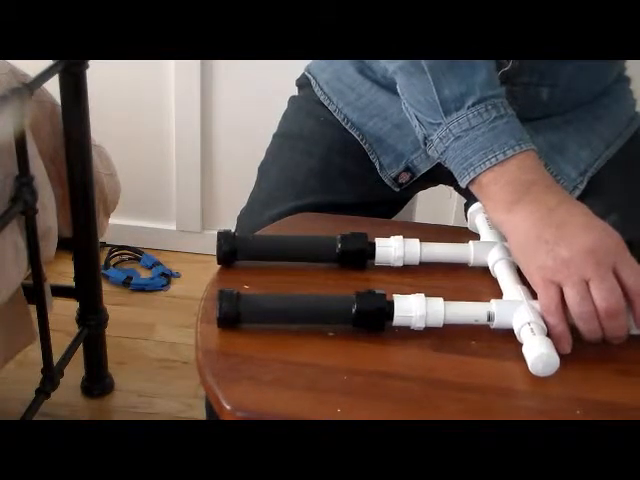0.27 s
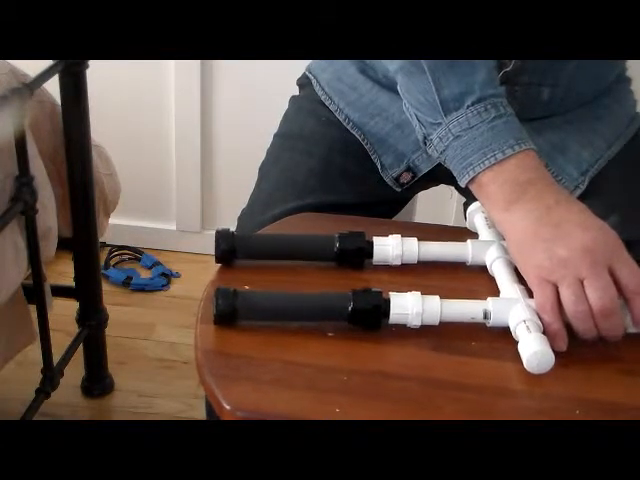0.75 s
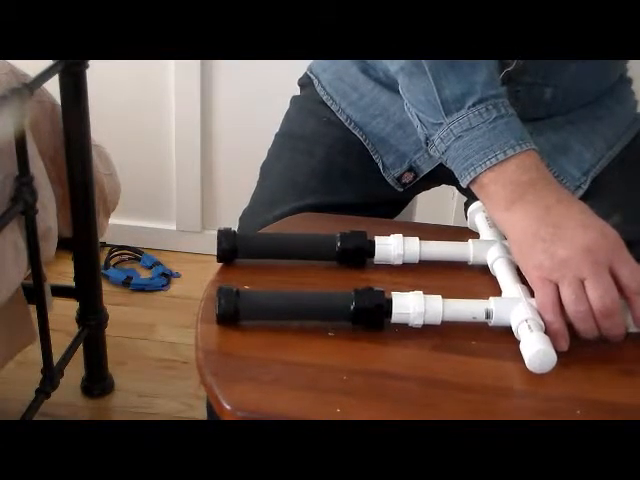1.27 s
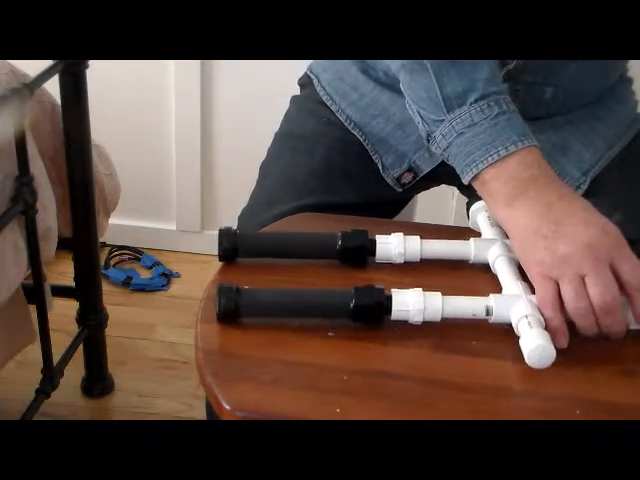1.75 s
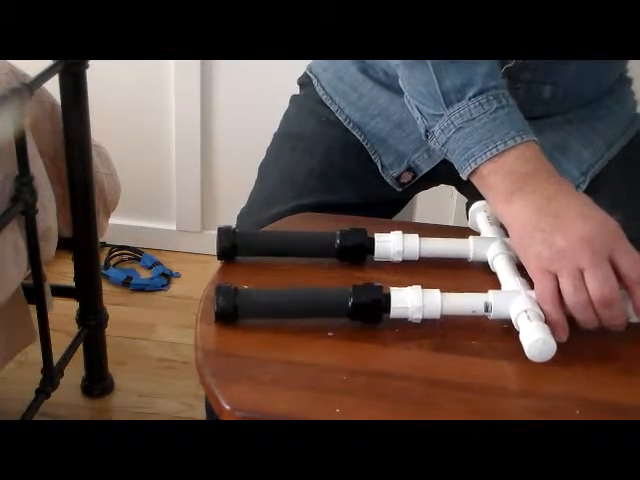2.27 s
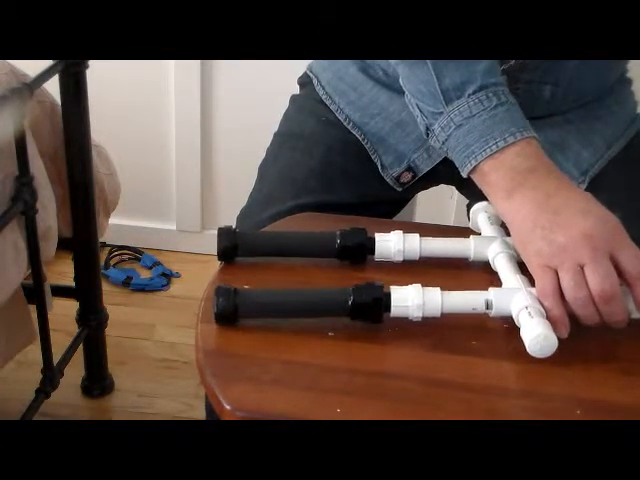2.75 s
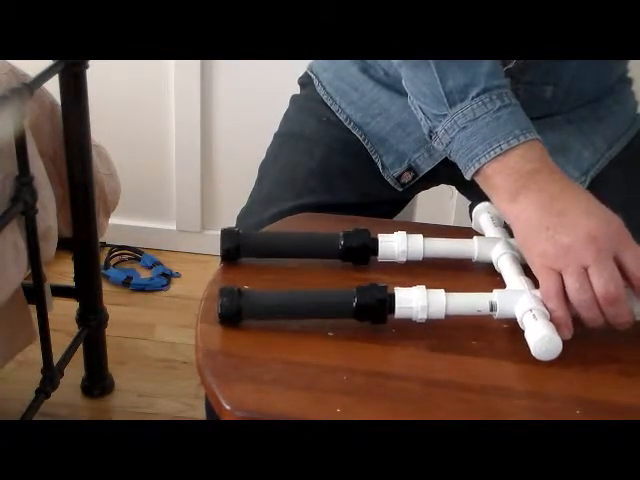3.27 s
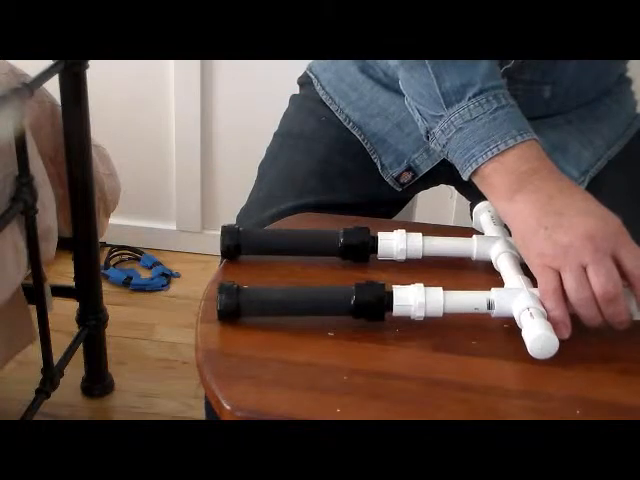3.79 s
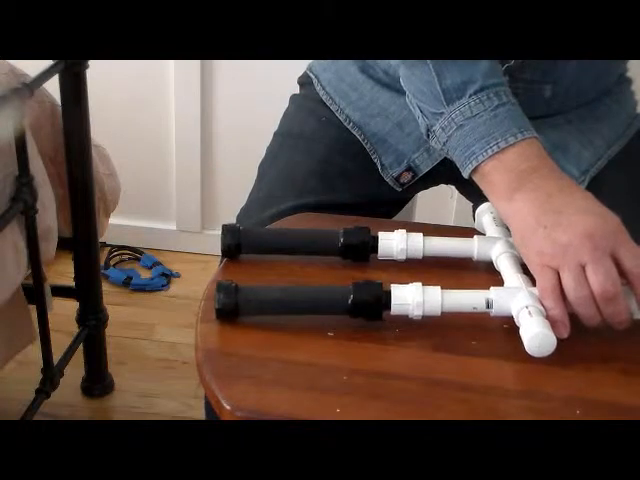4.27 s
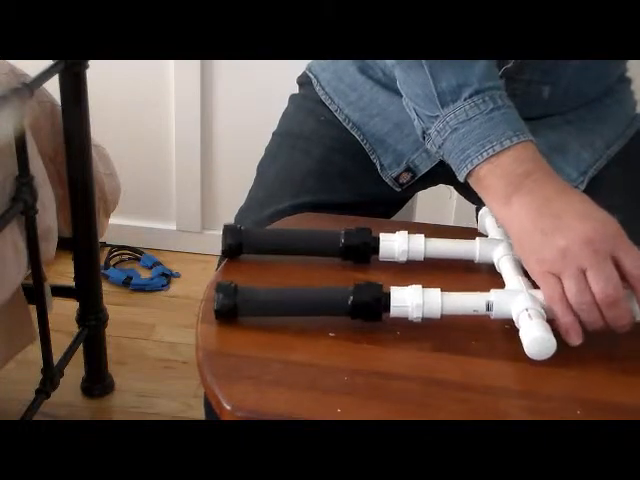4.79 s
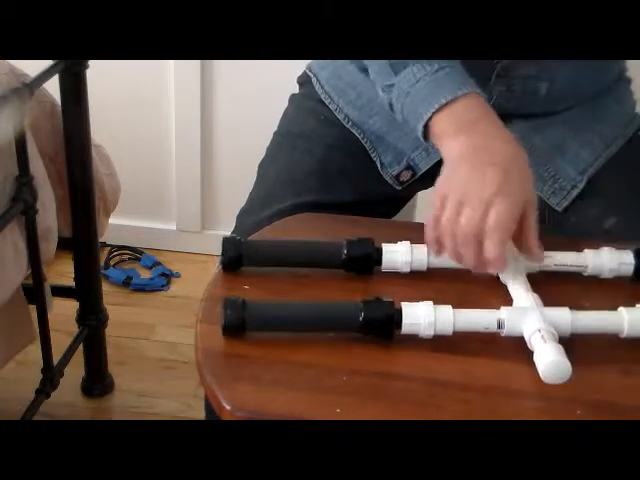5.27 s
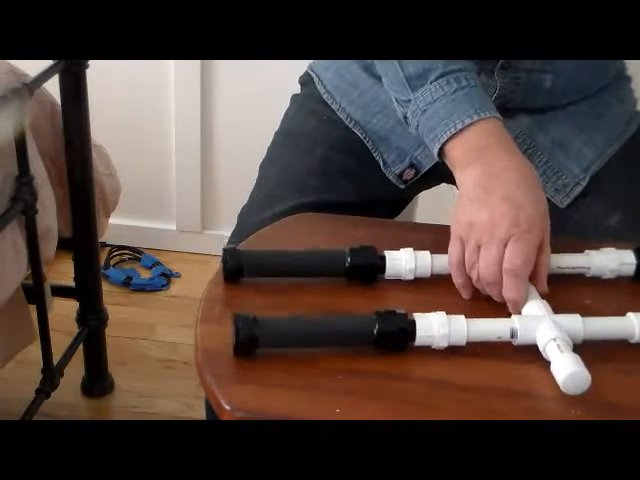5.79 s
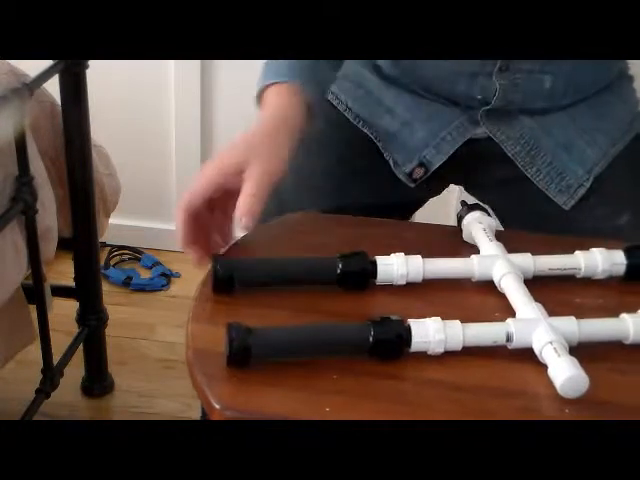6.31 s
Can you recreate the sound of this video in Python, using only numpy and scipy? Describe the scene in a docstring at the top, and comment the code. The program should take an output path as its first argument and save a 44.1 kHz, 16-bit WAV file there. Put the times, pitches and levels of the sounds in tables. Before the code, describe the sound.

Hard plastic pipe frame handled on a wooden table, with sharp bright clicks, hollow wooden knocks and short scrapes in a small quiet room.

```python
"""Knocks on wood, bright plastic clicks and a rough scraping, as a pipe frame is handled on a table in a small room.
Knocks and dragging excite the modes of the table top; each click is a snap with a brief ring of the pipe wall.
Dragging is a train of random stick-slip pushes; squeaks and groans are tones of wandering pitch.
Dull thuds, a rustling sleeve and the faint rumble and hiss of the room are filtered noise."""
import sys
import numpy as np
from scipy import signal
from scipy.fft import rfft, irfft, next_fast_len
from scipy.io import wavfile
from scipy.ndimage import map_coordinates

SR = 44100
rng = np.random.default_rng(int(sys.argv[2]) if len(sys.argv) > 2 else 0)


def transcribe(signal):
    """Save signal, clipped to [-1, 1], as a 16-bit WAV file at the path in sys.argv[1]."""
    frames = np.atleast_2d(signal).T
    limited = np.clip(frames, -1, 1)
    pcm = np.round(limited * 32767).astype(np.int16)
    wavfile.write(sys.argv[1], SR, pcm)


N = 288790
TIME = np.arange(N) / SR
AGE = np.arange(SR // 2) / SR  # seconds since a contact


def amp(db):
    """Level: decibels become an amplitude ratio."""
    return 10 ** (np.asarray(db) / 20)


def unit(x):
    """Normalisation: scaled to rms 1."""
    return x / np.sqrt(np.mean(x ** 2) + 1e-20)


def energy_one(x):
    """Energy normalisation: the mean energy of the channels becomes 1."""
    return unit(x) / np.sqrt(x.shape[-1])


def along(points, hz):
    """Logarithmic pitch: (Hz, value) points are read on a log frequency axis."""
    point_hz, value = np.transpose(points)
    return np.interp(np.log(hz + 1), np.log(point_hz), value)


def wobble(rate):
    """Random modulation: a smooth curve through random knots, rate of them a second."""
    knots = rng.standard_normal(int(N * rate / SR) + 4)
    return map_coordinates(knots, [TIME * rate])


def colour(x, points):
    """Minimum-phase filtering: a causal filter with the gain of the (Hz, dB) points."""
    n = x.shape[-1]
    m = 2 * next_fast_len(n // 2 + 2048)
    log_gain = np.log(amp(along(points, np.fft.rfftfreq(m, 1 / SR))))
    cepstrum = irfft(log_gain)
    # folding the cepstrum onto positive time makes the filter causal
    cepstrum[1:m // 2] *= 2
    cepstrum[m // 2 + 1:] = 0
    response = np.exp(rfft(cepstrum))
    return irfft(rfft(x, m) * response, m)[..., :n]


def band(x, edge_hz, kind, order=4):
    """Butterworth filtering: low-, high- or band-pass."""
    return signal.sosfilt(signal.butter(order, edge_hz, kind, fs=SR, output='sos'), x)


def add(track, s, sound):
    """Superposition: a sound is mixed into the track at time s."""
    part = track[..., max(round(s * SR), 0):][..., :sound.shape[-1]]
    part += sound[..., :part.shape[-1]]


def spread(pair, width):
    """Stereo decorrelation: two unrelated signals serve as mid and filtered side."""
    side = colour(pair[1], width)
    return np.array([pair[0] + side, pair[0] - side])


def air(spectrum, width):
    """Stationary noise: steady coloured stereo noise of rms 1."""
    noise = spread(rng.standard_normal((2, N)), width)
    return unit(colour(noise, spectrum))


def swell(start, length, db, rise_db_per_s, fall_db_per_s):
    """Exponential growth and decay: one movement rises to its level, holds and dies away."""
    before = np.maximum(start - TIME, 0)
    after = np.maximum(TIME - start - length, 0)
    return amp(db - rise_db_per_s * before - fall_db_per_s * after)


def movements(starts, lengths, levels, rise_db_per_s, fall_db_per_s, rest_db):
    """Power addition: the gains of all movements add as powers to a resting level."""
    power = amp(rest_db) ** 2
    for row in zip(starts, lengths, levels):
        power = power + swell(*row, rise_db_per_s, fall_db_per_s) ** 2
    return np.sqrt(power)


# Spectrum of the still room. Each row: frequency in Hz, relative level in dB.
STILL_SPECTRUM = [(15, -4), (30, 8.5), (39, -7.5), (52, 4), (75, -2), (105, -18.5), (197, -16.5),
                  (305, -19), (587, -24.5), (800, -28), (2000, -30.5), (11500, -34.5), (13500, -36)]
# Stereo width of the still room. Each row: frequency in Hz, side gain in dB.
STILL_WIDTH = [(30, -41), (70, -6.5), (200, -3.5), (1000, 0), (3000, 0.5), (10000, -2.5)]


def still_room(level_db=-52):
    """Ambient noise: steady, wide noise makes the rumble and hiss."""
    return amp(level_db) * band(air(STILL_SPECTRUM, STILL_WIDTH), 9.2, 'high', order=2)


# Stereo width of the reflected sound, also used for the sleeve. Each row: frequency in Hz, side gain in dB.
REFLECTED_WIDTH = [(100, -16), (260, -26), (500, -17.5), (1000, -11), (2000, -14), (4000, -6), (8000, -4.5)]
# Reverberation of the room. Each row: frequency in Hz, decay time over 60 dB in seconds.
ROOM_T60 = [(100, 1), (260, 0.25), (700, 0.35), (1800, 0.29), (5000, 0.22), (12000, 0.18)]


def tail():
    """Diffuse reverberation: fresh noise decays at a rate set by its frequency."""
    hz, t, z = signal.stft(rng.standard_normal((2, len(AGE))), SR, nperseg=256)
    decay = amp(-60 * t / along(ROOM_T60, hz)[:, None])
    pair = signal.istft(z * decay, SR, nperseg=256)[1]
    return energy_one(spread(pair[:, :len(AGE)], REFLECTED_WIDTH))


# The arm moves and the sleeve brushes. Each row: start in seconds, length in seconds, level in dB.
SLEEVE_BRUSHES = [(0.117,0.021,-58), (1.075,.11,-62.5), (1.595,0.042,-57), (5.843,0.26,-60),
                  (6.31,0.41,-57.5)]
# Spectrum of rubbing cloth. Each row: frequency in Hz, relative level in dB.
CLOTH_SPECTRUM = [(300, 3.5), (1200, 7), (3500, 3.5), (7000, -1), (13000, -20)]


def sleeve(flutter_db=2, rise_db_per_s=143, fall_db_per_s=140, rest_db=-74.5):
    """Friction noise: brushing denim is coloured noise that swells with the arm and flutters."""
    motion = movements(*np.transpose(SLEEVE_BRUSHES), rise_db_per_s, fall_db_per_s, rest_db)
    return motion * amp(flutter_db * wobble(40)) * air(CLOTH_SPECTRUM, REFLECTED_WIDTH)


# Body weight shifts. Each row: start in seconds, relative level in dB.
WEIGHT_SHIFTS = [(0.127,-43.5), (0.259,-46.5), (0.652,-40), (1.63,-46), (3.48,-40), (3.819,-38),
                 (5.211,-41.5)]


def thuds(t60=0.25, rise=0.021):
    """Low-frequency excitation: soft, heavy pushes stir only the bass, which builds up and decays (s)."""
    out = np.zeros(N)
    envelope = amp(-60 * AGE / t60) * (1 - np.exp(-AGE / rise))
    for s, db in WEIGHT_SHIFTS:
        boom = band(rng.standard_normal(len(AGE)), [36, 78], 'band', order=2) * envelope
        add(out, s, amp(db - 14) * unit(boom))
    return out


# Slips lock into the squeak of a fitting or the groan of a rubber grip.
# Each row: start in seconds, length in seconds, mean pitch in Hz, relative level in dB.
LOCKED_SLIPS = [(.275, .045, 3580, -57), (.42, .07, 4150, -70), (1.125, .085, 3290, -59),
                (1.605, .045, 3270, -54), (5.825, .035, 450, -38), (5.985, .06, 435, -41),
                (6.128, .05, 440, -44)]


def squeaks():
    """Friction-driven oscillation: a short tone of wandering pitch and level, with its room answer."""
    out = np.zeros(N)
    for s, length, hz, db in LOCKED_SLIPS:
        envelope = np.sin(np.pi * np.clip((TIME - s) / length, 0, 1))
        pitch = hz * (1 + .026 * wobble(600))
        flutter = amp(3.5 * wobble(120))
        out += amp(db) * envelope * flutter * np.sin(2 * np.pi * np.cumsum(pitch) / SR)
    room = signal.fftconvolve(out[None], tail(), axes=1)[:, :N]
    return 0.97 * (out + room)


# Clear modes of the table top with the frame on it.
# Each row: frequency in Hz, relative level in dB before scatter, decay time over 60 dB in seconds.
TABLE_MODES = [(143, -6, 0.79), (178.3, 2.5, 0.24), (225.9, -0.5, 0.49), (303, -5, 0.48), (433, 7, 0.047),
               (461.2, 4, 0.15), (510.6, 3, 0.12), (598, 9.5, 0.14), (664, 1.5, 0.17), (794, 0, 0.29),
               (940, 2.5, 0.12), (978, 2, 0.22), (1100, -0.5, 0.049), (1262, -16, 0.46), (1316, -12, 0.21),
               (1494, -24, 0.33), (1570, -41, 0.16), (1585, -7.5, 0.13), (1746, -12, 0.24),
               (2156, -5.5, 0.043)]
# Dense, overlapping resonances of the wood. Each row: frequency in Hz, relative level in dB.
DENSE_WOOD = [(40, -35), (100, -4.5), (165, -6.5), (240, 1), (450, 1.5), (680, -1), (740, -7), (850, 3.5),
              (980, -9), (1080, -12), (1400, -11), (1900, -22), (3000, -28.5), (5000, -46.5), (12000, -60)]


def table_answer(favoured_hz, favour_db, ring_db, scatter_db=2):
    """Modal superposition: clear modes, weighted near one pitch, ring over dense wood and room resonances."""
    hz, db, t60 = np.transpose(TABLE_MODES)[:, :, None]
    favour = favour_db * np.exp(-(np.log(hz / favoured_hz) / 0.076) ** 2)
    db = db + scatter_db * rng.standard_normal(hz.shape) + favour
    tones = np.sin(2 * np.pi * (hz * AGE + rng.random(hz.shape)))
    ring = np.sum(amp(db - 60 * AGE / t60) * tones, axis=0)
    return amp(ring_db) * energy_one(ring) + energy_one(colour(tail(), DENSE_WOOD))


def slips(rate, spread_db):
    """Stick-slip friction: random pushes of uneven size and sign, on average rate a second, rms 1."""
    size = amp(spread_db * np.clip(rng.standard_normal(N), -2, 2))
    sign = np.sign(rng.standard_normal(N))
    return unit(size * sign * (rng.random(N) < rate / SR))


# The hand shoves the frame a little way. Each row: start in seconds, length in seconds, relative level in dB,
# low judder in dB and grit in dB (both relative to that level).
HAND_SHOVES = [(0.261,0.033,-49.5,1,-3), (0.752,0.18,-59,5,-4), (0.974,0.13,-52,-11,-11),
               (1.134,0.1,-63.5,12,-18), (1.566,0.15,-62,7,-19), (1.96,0.091,-46.5,-1.5,-4),
               (2.116,0.078,-43,-5.5,-7.5), (2.311,0.1,-47,-1.5,-11.5), (2.487,0.084,-46.5,-9,-6),
               (2.584,0.044,-51,8.5,-30), (2.92,.09,-53,1.5,-8), (3.058,0.11,-44,-1,-15.5),
               (3.388,0.19,-52,3.5,-6), (3.799,0.088,-52.5,10.5,-3), (3.93,0.053,-44,-2.5,-13),
               (4.015,0.037,-58,12,-21), (4.288,0.058,-48,-6,-5), (4.467,0.055,-50,1.5,-5),
               (4.594,0.066,-50,4.5,-13), (4.684,0.032,-40,-6,-31), (4.865,0.13,-46,1.5,-7.5),
               (5.062,0.026,-45,-5,-0.5), (5.104,0.022,-31.5,-13,-7), (5.164,0.062,-35,-5.5,-17.5),
               (5.263,0.12,-53.5,-18,-30), (5.719,0.21,-53,0.5,-2), (5.938,0.062,-44,-8,-8.5),
               (6.042,0.059,-41.5,-3,-7.5), (6.13,0.093,-49,-4,-6.5)]
# Spectrum of rasping on the varnish. Each row: frequency in Hz, relative level in dB.
GRIT_SPECTRUM = [(700, -40), (1000, 3), (1350, 2.5), (1700, 0.5), (1950, 0), (2700, -1), (3550, -6),
                 (4200, -6.5), (6000, -15), (9000, -30.5), (14000, -57)]


def drag(grit_db=-1, direct=0.53, lead=0.013, count=24):
    """Forced vibration: slips shake the table and rasp on varnish; the answer changes as the contact wanders."""
    start, length, db, judder, grit = np.transpose(HAND_SHOVES)
    start = start - lead
    # a shove breaks loose, then comes to rest (dB/s); the last figure is creep under the resting hand (dB)
    shaking = movements(start, length, db + judder, 535, 271, -71.5)
    rubbing = movements(start, length, db, 535, 330, -71.5)
    rasping = movements(start, length, db + grit + grit_db, 535, 330, -76)
    pushes = slips(rate=600, spread_db=3.0)
    forces = shaking * pushes, rubbing * pushes, rasping * slips(rate=400, spread_db=8.5)
    out = np.zeros((2, N))
    for stretch in np.array_split(np.arange(N), count):
        damping = amp(-25 * AGE)  # the pressing hand damps the wood
        wood = table_answer(600, favour_db=-2, ring_db=2.5) * damping
        low = band(wood, 284, 'low')
        middle = band(wood, [350, 1900], 'band')
        rasp = colour(tail() + direct * (AGE == 0), GRIT_SPECTRUM)
        for force, answer in zip(forces, (low, middle, rasp)):
            sound = signal.fftconvolve(force[None, stretch], energy_one(answer), axes=1)
            add(out, stretch[0] / SR, sound)
    return out


WALL_HZ, SNAP_HZ = 3580, 5750  # usual pitch of the pipe wall and centre of its snap


def creep_clicks(level_db=-46, scatter_db=6.5, ring_db=2, snap_db=-16):
    """Strain release: each shove strains a fitting, which gives once at a random moment."""
    rows = []
    for s, length, *_ in HAND_SHOVES:
        when, size = rng.random(2)
        rows.append((s + length * when, level_db + scatter_db * (2 * size - 1), WALL_HZ, ring_db, snap_db))
    return rows


# Hard fittings click. Each row: start in seconds, relative level in dB, pitch of the pipe wall in Hz,
# relative wall ring in dB, relative snap in dB.
FITTING_CLICKS = [(0.151,-18.5,3730,-13,-22), (0.161,-28.5,3160,2.5,-18), (0.172,-31,2910,-7,-10),
                  (0.9008,-43,3480,-3,-17), (0.9748,-33.5,2650,-9,-32), (1.039,-23.5,3660,-3.5,-11.5),
                  (1.511,-38,2600,-8,-18), (1.6092,-27.5,3260,-15,-20), (1.9236,-29,3630,5,-0.5),
                  (1.984,-37,3570,0,-20), (2.043,-33,2900,-5,-14), (2.0864,-25.5,3550,-4,-22),
                  (2.111,-34,3000,-5,-22), (2.29,-29,4050,-6,-40), (2.3433,-37.5,3530,2.5,-15),
                  (2.4602,-31.5,3540,-3,-10), (2.4687,-21.5,3050,-4,-17.5), (2.55,-29.5,2600,-16,-26),
                  (2.851,-29,2920,4,-5), (3.0241,-28,3570,-1.5,-28), (3.064,-27.5,2560,-11,-31),
                  (3.338,-31.5,3650,-12,-31), (3.375,-28,2600,-9,-15), (3.4098,-36.5,4200,3,-5.5),
                  (3.474,-25.5,3640,-0.5,-14), (3.81,-31.5,2530,-5,-25), (4.2309,-22.5,3580,-1.5,-12.5),
                  (4.3324,-36,3680,3,-18), (4.4439,-24.5,3630,-2.5,-14.5), (4.476,-31,3530,3,-19),
                  (4.8226,-22.5,3440,-19,-20), (4.8813,-33.5,3500,-6,-16), (4.918,-28,7700,-4,-16.5),
                  (4.958,-28,3600,3,-17.5), (5.0485,-34.5,3430,-1,-18), (5.1103,-23,3580,5,-24),
                  (5.421,-32.5,2700,-13,-37), (5.65,-26.5,3620,-9.5,-21), (5.7346,-31.5,3490,1,-23),
                  (5.8762,-37,3030,-12,-4.5), (6.285,-34.5,3400,-12,-30)]
# Spectrum of the snap. Each row: multiple of the centre frequency, relative level in dB.
SNAP_SPECTRUM = [(.3, -28), (.65, -1), (.88, 0.5), (1, -0.5), (1.15, 0), (1.35, -7.5), (1.7, -10),
                 (2.2, -16)]
# Spectrum of the tick. Each row: frequency in Hz, relative level in dB.
TICK_SPECTRUM = [(300, -5.5), (1000, 2.5), (1800, -13), (2700, -1.5), (4500, -4), (6000, -13.5),
                 (12000, -16.5)]


def clicks(wall_db=7, wall_t60=0.018, tick_db=4, snap_db=18, room_db=-1, wall_room_db=-9,
           room_delay=.004, crumble=0.2, direct_top_hz=7600):
    """Impulsive excitation: a tiny slip gives a bright snap and a brief ring of the pipe wall, then the room."""
    out = np.zeros((2, N))
    t = AGE[:2048]
    for s, db, hz, ring, snap in FITTING_CLICKS + creep_clicks():
        snap_hz = SNAP_HZ * hz / WALL_HZ  # a higher wall snaps higher
        wall = energy_one(np.sin(2 * np.pi * hz * t) * amp(-60 * t / wall_t60))
        wall = amp(wall_db + ring) * wall
        crumbs = crumble * rng.standard_normal((2, len(t))) * amp(-60 * t / .014)
        push = (t == 0) + crumbs  # one slip and its crumbs
        tick = amp(tick_db) * energy_one(colour(push[0], TICK_SPECTRUM))
        bright = energy_one(colour(push[1], np.array(SNAP_SPECTRUM) * [snap_hz, 1]))
        crack = tick + amp(snap + snap_db) * bright
        direct = wall + band(crack, direct_top_hz, 'low', order=2)
        add(out, s + 0.00035, amp(db) * direct)
        room = signal.fftconvolve(tail(), [crack + amp(wall_room_db) * wall], axes=1)
        add(out, s + room_delay, amp(db + room_db) * room)
    return out


# The frame knocks on the table. Each row: start in seconds, relative level in dB, relative bass in dB,
# relative hardness (treble) in dB, frequency in Hz favoured by the place of contact.
FRAME_KNOCKS = [(0.128,-40,-3.5,-12.5,187), (0.152,-33.5,-10.5,-17,185), (0.25,-37,-5,-40,430),
                (0.681,-41,-13,-23,414), (0.739,-36.5,-16,-17,600), (0.974,-39.5,-21,-8.5,590),
                (1.039,-32,-11,-19.5,411), (1.51,-47.5,-15,-13,191), (1.61,-42,-3.5,-11,596),
                (1.922,-30,-12.5,-17.5,406), (1.983,-35,-16,-25,930), (2.086,-48.5,-8,-1,940),
                (2.290,-38.5,-12,-7,920), (2.342,-38,-17,-17,456), (2.464,-41,-9,-7.5,514),
                (2.849,-33.5,-11,-14.5,214), (3.023,-51,3.5,-6,228), (3.057,-32,-35,-22,470),
                (3.293,-53,5,-27,206), (3.374,-53,1,3,182), (3.474,-26,-10,-19,245),
                (3.76,-36,-8.5,-25,226), (3.818,-23,-15,-18.5,833), (3.833,-37,-0.5,-32,303),
                (4.236,-39,-11.5,-27,444), (4.443,-34,-15.5,-14,563), (4.66,-19,-22,-10,883),
                (4.828,-38.5,-30,-13,506), (4.914,-31,-21,-35,598), (5.04,-38.5,-12,-20,610),
                (5.213,-25.5,-11,-17,594), (5.221,-16,-41,-28.5,787), (5.485,-61.5,10,1,190),
                (5.65,-49,-7,-2.5,1110), (5.735,-33.5,-16,-25,940), (5.816,-28.5,-12.5,-20,446),
                (5.842,-24,-29,-32,417), (5.871,-24,-16,-15.5,433), (5.88,-21.5,-19.5,-14,940),
                (5.906,-39,1,-19,143), (6.531,-51,19,-31,168)]


def knocks(middle_db=22, bass_db=31, hard_db=31, rise=0.0019, quick_rise=0.00068):
    """Impact excitation: heavy contacts boom, hard ones clack; low modes build up more slowly (rises in s)."""
    out = np.zeros((2, N))
    # near walls keep the sound up for some 50 ms before it falls away
    held = amp(np.interp(AGE, [0, .045, .075], [0, 5, 0]))
    slow = 1 - np.exp(-AGE / rise)
    quick = 1 - np.exp(-AGE / quick_rise)
    for s, db, bass, hard, hz in FRAME_KNOCKS:
        blow = table_answer(hz, favour_db=20, ring_db=3.5)
        body = blow * held * slow
        low = amp(bass + bass_db) * energy_one(band(body, 333, 'low'))
        middle = amp(middle_db) * energy_one(band(body, [350, 1100], 'band'))
        high = amp(hard + hard_db) * energy_one(band(blow * quick, 1183, 'high', order=6))
        add(out, s, amp(db) * (low + middle + high))
    return out


def scene():
    """Superposition: the handled frame sounds over the quiet of the room."""
    return still_room() + sleeve() + thuds() + squeaks() + drag() + clicks() + knocks()


def record(dry, top_hz=13500):
    """Band limiting: a very steep low-pass removes what lies above top_hz."""
    m = next_fast_len(N + SR // 2)
    gain = 1 / (1 + (np.fft.rfftfreq(m, 1 / SR) / top_hz) ** 80)
    return irfft(rfft(dry, m) * gain, m)[:, :N]


dry = scene()
out = record(dry)
transcribe(out)
```